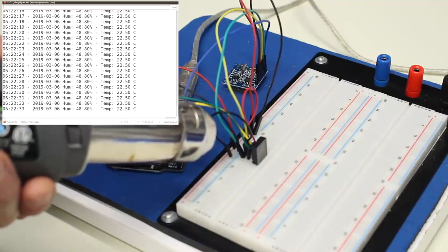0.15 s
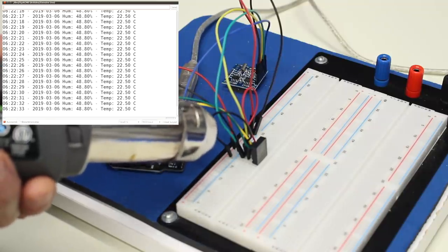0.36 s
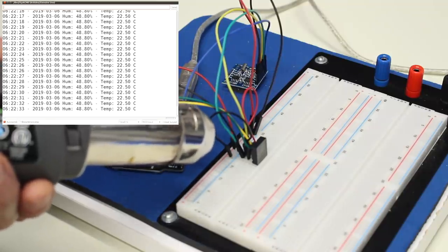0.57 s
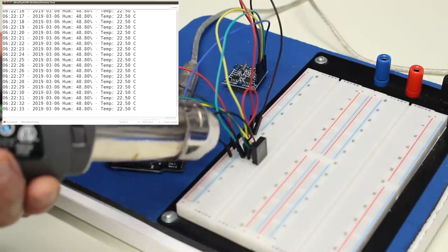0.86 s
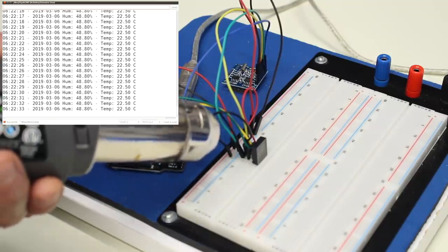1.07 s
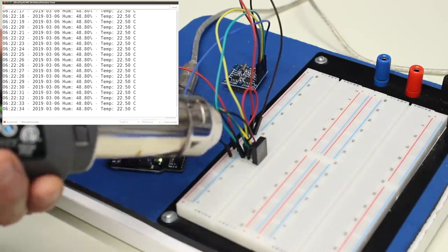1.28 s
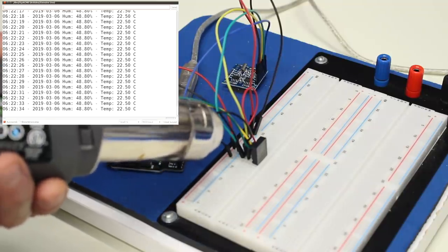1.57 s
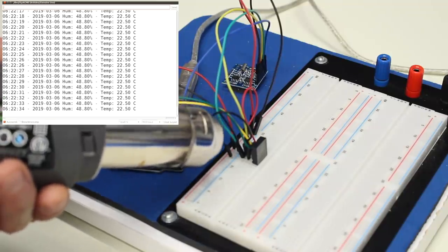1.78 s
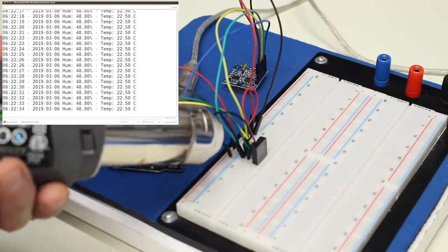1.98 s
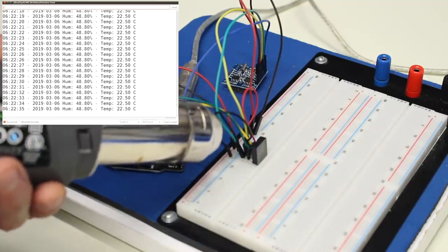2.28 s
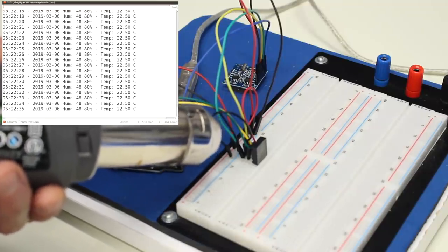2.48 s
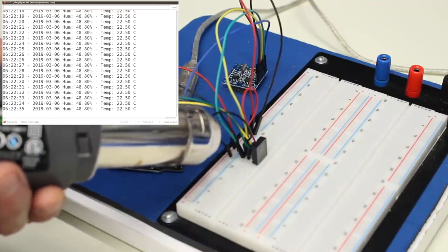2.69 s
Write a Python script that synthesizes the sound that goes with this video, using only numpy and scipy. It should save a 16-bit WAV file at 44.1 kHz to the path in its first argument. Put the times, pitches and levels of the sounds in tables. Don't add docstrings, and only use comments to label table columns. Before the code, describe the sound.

Constant heat gun blast: buzzy motor whir and hollow rushing air, shifting slightly as it turns.

```python
import sys
import numpy as np
from scipy import signal
from scipy.fft import rfft, irfft, next_fast_len
from scipy.io import wavfile
from scipy.ndimage import uniform_filter1d, map_coordinates

SR = 44100
rng = np.random.default_rng(int(sys.argv[2]) if len(sys.argv) > 2 else 0)


def dump(signal):
    limited = np.clip(np.atleast_2d(signal).T, -1, 1)
    pcm = np.round(limited * 32767).astype(np.int16)
    wavfile.write(sys.argv[1], SR, pcm)


def natural_amplitude(level_db):
    exponent = np.asarray(level_db, float) / 20
    return 10 ** exponent


N = 125685
STEP = 64
LEFT_RIGHT = np.array([[.5], [-.5]])


def unit(x):
    return x / np.sqrt(np.mean(x ** 2) + 1e-20)


def along(points, hz):
    f, v = np.transpose(points)
    return np.interp(np.log(hz + 1), np.log(f + 1), v)


def curves(rows):
    s, *cols = np.transpose(rows)
    return [np.interp(np.arange(N) / SR, s, c) for c in cols]


def wobble(rate_hz, count):
    at = np.arange(0, N, STEP) * rate_hz / SR
    knots = rng.standard_normal((count, 100))
    return np.array([map_coordinates(row, [at], mode="wrap") for row in knots])


def fine(coarse):
    return np.interp(np.arange(N) / STEP, np.arange(len(coarse)), coarse)


def filtered(x, response):
    m = next_fast_len(N + SR // 2)
    return irfft(rfft(x, m) * response(np.fft.rfftfreq(m, 1 / SR)), m)[..., :N]


# shaft_multiple, level_db (rms), facing_gain_db, roll_gain_db, tilt_gain_db
MOTOR_TONES = [(1, -44.0, -0.5, 1.0, 0.5), (3, -47.0, -2.0, 0.5, -2.5), (6, -29.5, 0.0, -0.5, -0.5),
               (7, -40.0, 10.5, 2.0, -1.5), (9, -49.5, 2.0, -1.0, -1.5), (10, -34.0, 4.0, 0.0, -1.0),
               (11, -51.5, -3.0, 2.0, -1.5), (12, -40.5, 6.5, 0.0, -1.5), (13, -30.0, 2.0, 0.5, -0.5),
               (14, -43.0, -5.0, -2.0, -0.5), (15, -37.0, -3.0, 2.5, -1.5), (16, -47.0, -8.0, -2.0, -1.0),
               (17, -45.5, -1.5, -3.0, 1.0), (18, -40.0, 1.5, 1.0, 0.0), (19, -40.5, -0.5, 2.5, -1.5),
               (20, -36.0, 1.0, 1.0, -2.5), (21, -49.5, 2.5, -4.0, 4.0), (22, -48.5, -3.0, 0.5, 0.0),
               (23, -51.5, -5.5, 2.5, -3.5), (24, -51.5, -2.0, -1.0, 2.5), (25, -47.0, 3.0, 0.0, 2.0),
               (26, -49.5, 1.5, -5.0, 0.5), (27, -50.0, -2.0, 2.0, -1.0), (28, -48.0, -2.5, 0.5, -1.5),
               (29, -56.5, 2.5, 3.0, -1.5), (30, -46.0, -2.5, -1.0, -1.5), (31, -56.5, -3.5, -9.5, -5.5),
               (32, -45.5, 7.5, -2.5, -2.0), (33, -47.0, 10.0, -2.0, -0.5), (34, -54.0, 4.0, -2.5, -0.5)]
# shaft_multiple, level_db (rms), facing_gain_db, roll_gain_db
BRUSH_WHINE = [(35, -63.5, 2.0, 1.0), (36, -64.5, 0.0, -3.0), (37, -62.5, -3.5, -1.0),
               (38, -68.0, -5.5, 3.0), (39, -54.5, 0.5, 4.0), (40, -58.5, -4.0, 1.0), (41, -54.5, 1.0, 1.5),
               (42, -66.0, 4.0, 2.5), (43, -64.0, -4.5, -1.0), (44, -65.0, 4.0, 2.5),
               (45, -59.0, -3.0, 2.0), (46, -62.0, -2.0, -0.5), (47, -64.5, -2.0, 2.0),
               (48, -63.5, 2.5, 0.5), (49, -70.5, -1.5, -2.0), (50, -63.0, -1.0, -5.0),
               (51, -57.0, 4.0, -0.5), (52, -61.0, -2.0, 0.5), (53, -66.0, -1.0, -3.0),
               (54, -68.5, -6.0, 1.5), (55, -65.5, 7.5, -0.5), (56, -71.5, 1.0, -1.0),
               (57, -62.0, 3.0, -2.0), (58, -71.5, 5.0, 1.0), (59, -61.5, 0.5, -1.0),
               (60, -66.5, -1.0, 4.0), (61, -63.5, 2.0, 2.5), (62, -65.5, 3.5, 1.5), (63, -72.0, -5.5, 0.0),
               (64, -68.5, -0.5, -1.0)]
# shaft_multiple, level_db (rms), facing_gain_db, roll_gain_db
FAINT_WHINE = [(65, -70.0, -1.5, -0.5), (66, -64.0, -3.5, -2.0), (67, -70.0, -1.5, -1.5),
               (68, -73.5, -4.5, -8.5), (69, -70.5, 0.0, 0.5), (70, -77.5, -2.5, 2.5),
               (71, -73.0, 3.0, 0.5), (72, -71.0, 1.5, 0.5), (73, -77.5, 0.5, -0.5), (74, -68.0, 0.0, 2.0),
               (75, -71.5, -1.5, -1.0), (76, -73.5, 1.5, 4.0), (77, -75.5, 2.0, -1.0),
               (78, -73.5, -1.0, 3.0), (79, -87.0, 2.5, 9.5), (80, -79.5, 0.5, -5.0), (81, -71.0, 0.0, 1.0),
               (82, -77.0, -4.5, -1.5), (83, -71.5, 0.5, -0.5), (84, -71.0, 2.5, 5.5),
               (85, -68.5, -2.5, 1.5), (86, -71.5, -3.5, 2.0), (87, -72.0, 0.0, 2.0), (88, -77.5, 9.0, 2.5),
               (89, -80.0, 10.0, 0.0)]
MOTOR_LIFT_DB, BRUSH_LIFT_DB, FAINT_LIFT_DB = .6, .3, .8
RIPPLE_HZ, RIPPLE_RAD, RIPPLE_TONE_DB = 120, .14, -39.5
WAVER_DB, WAVER_RATE_HZ, FLUTTER_DB, FLUTTER_RATE_HZ = .5, 5, .8, 25
SLIP_RAD, DRIFT_DB_PER_MULTIPLE = .008, .035
PULSED_FROM_MULTIPLE, PULSED_SPREAD = 25, .62
LINE_LEAN_DB, SCATTER_RAD_PER_MULTIPLE = 0.5, .007


def motor(angle, facing, roll, tilt):
    rows = [(k, db + MOTOR_LIFT_DB, *gains) for k, db, *gains in MOTOR_TONES]
    for table, lift_db in ((BRUSH_WHINE, BRUSH_LIFT_DB), (FAINT_WHINE, FAINT_LIFT_DB)):
        rows += [(k, db + lift_db, *gains, 0) for k, db, *gains in table]
    count = len(rows) + 1
    waver_db = WAVER_DB * wobble(WAVER_RATE_HZ, count)
    flutter_db = FLUTTER_DB * wobble(FLUTTER_RATE_HZ, count)
    waver = natural_amplitude(waver_db + flutter_db)
    drift = wobble(1.5, count)
    slips = SLIP_RAD * wobble(FLUTTER_RATE_HZ, count)
    starts, ripple_starts = rng.uniform(0, 2 * np.pi, (2, count))
    scatters, leans = rng.standard_normal((2, count))
    ripple = 2 * np.pi * RIPPLE_HZ * np.arange(N) / SR
    cos, sin = np.cos(ripple), np.sin(ripple)
    tones = np.zeros((2, N))
    for i, (k, db, facing_db, roll_db, tilt_db) in enumerate(rows):
        drift_db = DRIFT_DB_PER_MULTIPLE * max(k - PULSED_FROM_MULTIPLE, 0) * drift[i]
        turn_db = facing_db * facing + roll_db * roll + tilt_db * tilt
        level = fine(waver[i] * natural_amplitude(db + drift_db + turn_db))
        swing = RIPPLE_RAD * (np.cos(ripple_starts[i]) * cos + np.sin(ripple_starts[i]) * sin)
        start = starts[i] * (PULSED_SPREAD if k >= PULSED_FROM_MULTIPLE else 1)
        phase = k * angle + fine(np.sqrt(k) * slips[i]) + swing + start
        scatter = 2 * SCATTER_RAD_PER_MULTIPLE * k * scatters[i] * LEFT_RIGHT
        tones += level * natural_amplitude(LINE_LEAN_DB * leans[i] * LEFT_RIGHT) * np.sin(phase + scatter)
    ripple_tone = natural_amplitude(RIPPLE_TONE_DB) * fine(waver[-1]) * np.sin(11 * angle + ripple)
    return np.sqrt(2) * (tones + ripple_tone)


def rush(spectrum, alike, patchy_db):
    z = signal.stft(rng.standard_normal((2, N)), nperseg=512)[2]
    field = uniform_filter1d(rng.standard_normal(z.shape[1:]), size=4, axis=0)
    field = uniform_filter1d(field, size=12, axis=1)
    pair = signal.istft(z * natural_amplitude(patchy_db * unit(field)), nperseg=512)[1][:, :N]

    def mid_side(hz):
        turn = np.arccos(np.clip(along(alike, hz), -1, 1)) / 2
        return natural_amplitude(along(spectrum, hz)) * [np.cos(turn), np.sin(turn)]

    mid, side = filtered(pair, mid_side)
    return unit(np.array([mid + side, mid - side]))


# centre_hz, width_hz, gain_db
ECHO_STRANDS = [(284, 7.1, 1.5), (489, 16, 4), (686, 23, 0.5), (775, 7, 9.5), (927, 8, -4), (1062, 16, -11),
                (1100, 11.4, 4), (1257, 17, 7), (1517, 38, -6.5), (1572, 27, 6), (1645, 23, 4.5),
                (1900, 113, -4.5), (2728, 44, 4), (4030, 66, 5)]


def bench(x):
    def strands(hz):
        return natural_amplitude(sum(db * np.exp(-2 * ((hz - c) / w) ** 2) for c, w, db in ECHO_STRANDS))

    return filtered(x, strands)


# freq_hz, density_db (per Hz)
BARREL_SPECTRUM = [(30, -31), (110, -20.5), (140, -13.5), (400, -12), (500, -3.5), (700, -5), (800, -5.5),
                   (1100, -120)]
# freq_hz, density_db (per Hz)
HOWL_SPECTRUM = [(760, -120), (800, -12), (905, 1), (940, -1), (975, 4), (1056, 1.5), (1068, -30),
                 (1085, -120)]
# freq_hz, density_db (per Hz)
JET_SPECTRUM = [(780, -120), (830, 2.5), (1250, -3.5), (1500, -4), (2720, -6.5), (2800, -11), (3700, -13.5),
                (3900, -120)]
# freq_hz, density_db (per Hz)
NOZZLE_SPECTRUM = [(3500, -120), (3700, 2.5), (4000, 1.5), (4800, -0.5), (5200, -8.5), (5850, -3.5),
                   (6300, -13), (6600, -120)]
# freq_hz, density_db (per Hz)
HISS_SPECTRUM = [(6000, -120), (6300, -3), (7000, 0), (8500, -4), (10500, -7), (11700, -12), (12600, -21),
                 (16000, -27)]
# freq_hz, likeness (0..1)
ALIKE_BARREL = [(30, .62), (150, .985), (260, .98), (370, .94), (470, .99), (530, .82), (720, .85),
                (900, .984)]
# freq_hz, likeness (0..1)
ALIKE_JET = [(800, .984), (1600, .984), (2200, .991), (3700, .993), (4600, .94), (6400, .9), (10500, .72),
             (12500, .15)]
BARREL_DB, HOWL_DB, JET_DB, NOZZLE_DB, HISS_DB = -31.5, -25, -26, -35.5, -45
JET_TURN_DB, NOZZLE_TURN_DB = 1.5, 0.6
HOWL_FLUTTER_DB, HOWL_FLUTTER_RATE_HZ = 0.46, 15
CHOP_DEPTH = 0.028


def air(angle, facing, flow_db, howl_db):
    clumps_db = HOWL_FLUTTER_DB * fine(wobble(HOWL_FLUTTER_RATE_HZ, count=1)[0])
    rumble = natural_amplitude(BARREL_DB) * rush(BARREL_SPECTRUM, ALIKE_BARREL, patchy_db=0.9)
    howl = natural_amplitude(HOWL_DB + howl_db + clumps_db) * rush(HOWL_SPECTRUM, ALIKE_BARREL, patchy_db=0.4)
    jet = natural_amplitude(JET_DB + JET_TURN_DB * facing) * rush(JET_SPECTRUM, ALIKE_JET, patchy_db=-0.93)
    nozzle = natural_amplitude(NOZZLE_DB + NOZZLE_TURN_DB * facing) * rush(NOZZLE_SPECTRUM, ALIKE_JET, patchy_db=0.5)
    hiss = natural_amplitude(HISS_DB) * rush(HISS_SPECTRUM, ALIKE_JET, patchy_db=0.3)
    chop = 1 + CHOP_DEPTH * np.cos(angle)
    return natural_amplitude(flow_db) * bench(rumble + howl + jet + chop * (nozzle + hiss))


def mains_hum():
    hum_hz, hum_db = 60, -68
    return natural_amplitude(hum_db) * np.sqrt(2) * np.sin(2 * np.pi * hum_hz * np.arange(N) / SR)


# freq_hz, left_minus_right_db
PORT_LEAN = [(60, 1), (170, 2.5), (380, -1.5), (560, 1), (900, -1.5), (1050, -1.5), (1300, 1), (15000, 0)]
# freq_hz, left_lead_rad
PORT_LEAD = [(0, 0), (4300, .1), (5000, .6), (5700, .2), (7000, .8), (9000, 1.2), (11000, 1.4),
             (14000, 2.3)]
PAN_TURN_DB = -0.6


def microphone_ports(gun, facing):
    def ports(hz):
        lead_rad = np.interp(hz, *np.transpose(PORT_LEAD))
        return natural_amplitude(LEFT_RIGHT * along(PORT_LEAN, hz)) * np.exp(1j * LEFT_RIGHT * lead_rad)

    return filtered(gun * natural_amplitude(LEFT_RIGHT * PAN_TURN_DB * facing), ports)


# start_s, shaft_hz
SHAFT_SPEED = [(0.05, 170.88), (0.21, 170.96), (0.37, 171.11), (0.54, 171.27), (0.7, 171.4), (0.86, 171.71),
               (1.02, 171.95), (1.18, 172.07), (1.34, 172.14), (1.51, 172.27), (1.67, 172.23),
               (1.83, 172.42), (1.99, 172.48), (2.15, 172.77), (2.31, 172.72), (2.48, 172.32),
               (2.64, 172.36), (2.8, 172.45)]
# start_s, facing (-1..1, to camera), roll (-1..1, wrist), tilt (-1..1, barrel)
HAND_TURN = [(0.1, -1.0, -0.24, 0.86), (0.3, -0.94, -0.45, 0.21), (0.51, -0.69, -0.29, -0.18),
             (0.71, -0.44, -0.23, -0.51), (0.92, -0.32, 0.45, -1.0), (1.12, -0.11, 0.9, -0.19),
             (1.32, 0.02, 1.0, -0.0), (1.53, 0.3, 0.16, 0.01), (1.73, 0.35, 0.21, 0.21),
             (1.93, 0.44, -0.22, 0.35), (2.14, 0.57, -0.64, -0.27), (2.34, 0.63, -0.8, -0.53),
             (2.55, 0.63, 0.33, 0.74), (2.75, 0.56, -0.17, 0.29)]
# start_s, flow_db, howl_db
AIRFLOW = [(0, 0, 0), (.25, 0.1, 0.8), (.5, .4, 1.8), (.75, 0, -2.5), (1, -0.3, -3), (1.3, -0.2, 0),
           (1.6, -0.75, 0), (1.9, -0.6, -2.8), (2.1, -1.2, 2.5), (2.3, -0.5, -1.2), (2.52, -1.4, 1),
           (2.68, -0.4, -1.5), (2.85, -1.3, 3.5)]


def scene():
    shaft_hz, = curves(SHAFT_SPEED)
    facing, roll, tilt = curves(HAND_TURN)
    flow_db, howl_db = curves(AIRFLOW)
    angle = 2 * np.pi * np.cumsum(shaft_hz) / SR
    tones = motor(angle, facing[::STEP], roll[::STEP], tilt[::STEP])
    gun = tones + air(angle, facing, flow_db, howl_db)
    return microphone_ports(gun, facing) + mains_hum()


def top_cut(x):
    return signal.sosfilt(signal.butter(12, 15510, fs=SR, output="sos"), x)


def record(dry):
    return top_cut(dry)


dry = scene()
out = record(dry)
dump(out)
```